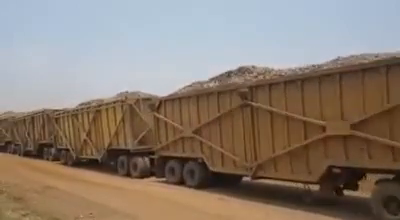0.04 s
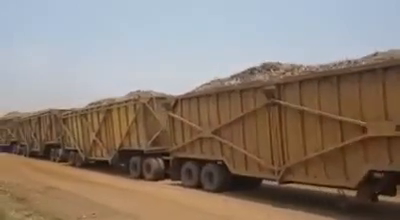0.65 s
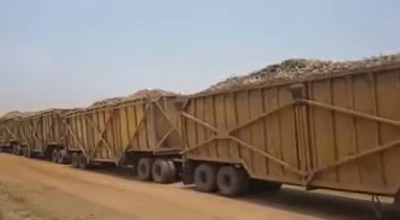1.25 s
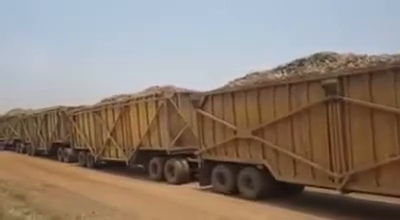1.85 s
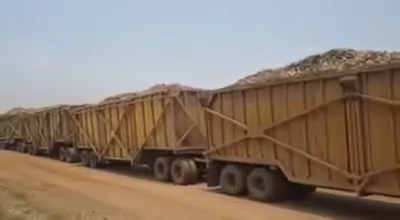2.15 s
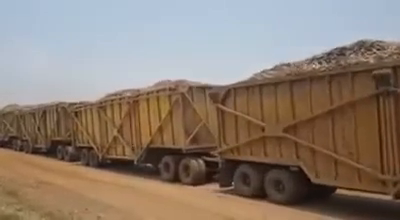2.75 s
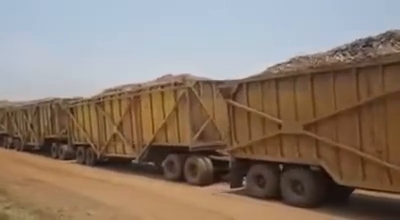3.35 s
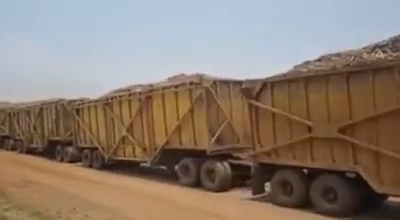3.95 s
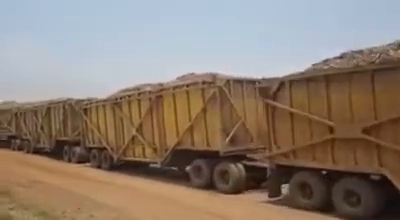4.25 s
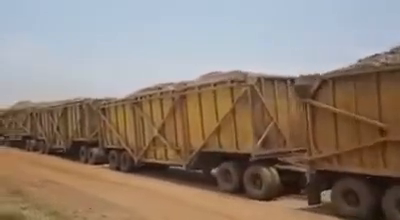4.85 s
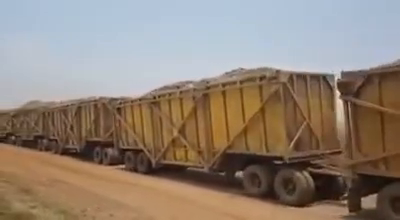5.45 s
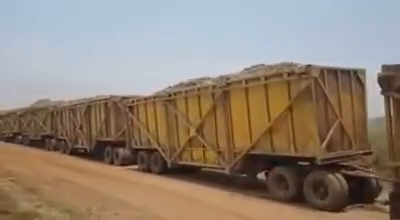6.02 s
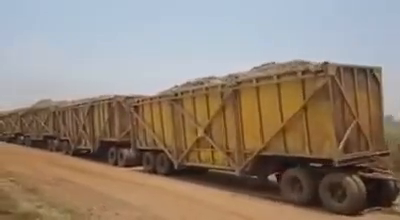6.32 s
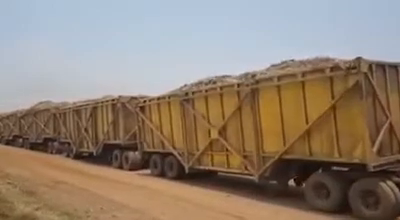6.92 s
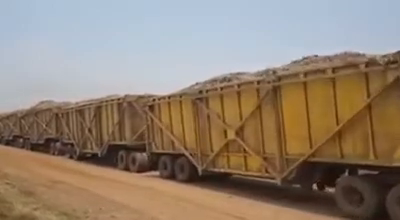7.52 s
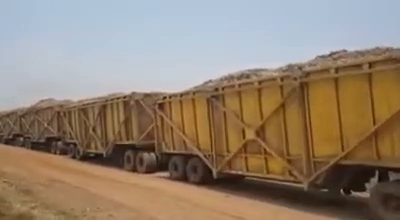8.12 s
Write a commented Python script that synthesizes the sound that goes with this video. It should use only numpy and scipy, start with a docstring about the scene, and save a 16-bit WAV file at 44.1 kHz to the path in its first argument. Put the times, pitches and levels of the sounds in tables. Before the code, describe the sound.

Heavy steel trailers roll slowly by with gritty tyre noise and bursts of clanking, while a low diesel engine draws away.

```python
"""A diesel road train pulls loaded steel trailers slowly along a dirt road, passing close by.
Its exhaust drones and chugs, and its engine clatters ahead on the right, the gear hum fading as it
draws away. The trailers rumble and many tyres grind over grit. Bumps make loose steel rattle and
clank in bursts, couplings thump and stones tick. Gusts buffet the microphones, mostly near the end."""
import sys
import numpy as np
from scipy import signal
from scipy.fft import rfft, irfft, next_fast_len
from scipy.io import wavfile
from scipy.ndimage import map_coordinates

SR = 44100
rng = np.random.default_rng(int(sys.argv[2]) if len(sys.argv) > 2 else 0)


def dump_mix(stems):
    """Bounce the given channels to the path in sys.argv[1] as a 16-bit WAV at rate SR."""
    frames = np.atleast_2d(stems).T  # one column per channel
    limited = np.clip(frames, -1, 1)  # hard clip at full scale
    pcm = np.round(limited * 32767).astype(np.int16)
    wavfile.write(sys.argv[1], SR, pcm)


N = 360507
TIME = np.arange(N) / SR
TRACTOR_LAG_S, TRAILER_LAG_S = 0.00047, 0.000398  # how much later the left microphone hears each


def from_db(db):
    """Turn decibels into a gain."""
    return 10 ** (np.asarray(db) / 20)


def left_gain(db):
    """Stereo gains that change only the left side."""
    return from_db([[db], [0]])


def unit_power(x):
    """Scale a signal to an average power of 1."""
    return x / np.sqrt(np.mean(x ** 2) + 1e-20)


def over_time(rows):
    """Join (seconds, value) points into a value for every sample."""
    return np.interp(TIME, *np.transpose(rows))


def at_hz(rows, hz):
    """Read between (Hz, value) points, with octaves evenly spaced."""
    pitches, values = np.transpose(rows)
    return np.interp(np.log(hz), np.log(pitches), values)


def drift(rate):
    """A smooth random wobble of size about 1 that changes roughly rate times a second."""
    pole = np.exp(-80 * np.pi * rate / SR)
    slow = signal.lfilter([1], [1, -2 * pole, pole * pole], rng.standard_normal(N // 40 + 2002))[2000:]
    return np.interp(np.arange(N) / 40, np.arange(len(slow)), unit_power(slow))


def swell(s, half_s):
    """A smooth rise and fall of height 1 around time s."""
    return np.exp(-.5 * np.minimum(((TIME - s) / half_s) ** 2, 100))


def add(out, s, sound):
    """Mix a short sound in at time s."""
    place = out[..., max(int(s * SR), 0):][..., :sound.shape[-1]]
    place += sound[..., :place.shape[-1]]


def ping(hz, ring_s):
    """A struck note that fades by 60 dB in ring_s seconds."""
    age = TIME[:int(np.clip(ring_s, .005, .3) * SR)]
    return np.sin(2 * np.pi * hz * age) * np.exp(-np.log(1000) * age / ring_s)


def ping_at(s, hz, ring_s):
    """A silent track with one ping at time s."""
    out = np.zeros(N)
    add(out, s, ping(hz, ring_s))
    return out


# Sound that arrives without scattering. Each row: frequency in Hz, share from 0 to 1.
DIRECT_SHARE = [(100, 1), (250, 1), (600, 0.71), (950, 1), (1300, 1), (2000, 0.78), (4000, 0.47),
                (8000, 0.5)]
# Sound bends round to the left microphone. Each row: frequency in Hz, extra delay in milliseconds.
BEND_DELAY = [(300, 0.0041), (600, 0.042), (950, 0.044), (1200, 0.0021), (1650, 0.063), (2100, 0.029),
              (3000, 0.03), (6000, 0)]
# The left microphone is shaded from the truck. Each row: frequency in Hz, gain in dB.
LEFT_SHADE = [(150, 1.5), (500, -1.5), (1000, -0.5), (1600, -1.1), (2500, -7.5), (4700, -5), (8000, -5.5)]


def stereo_noise(spectrum, lag_s, beside):
    """Noise from ahead (reaching the left late), from straight beside, and scattered all around."""
    size = next_fast_len(N)
    hz = np.maximum(np.arange(size // 2 + 1) * SR / size, 1)
    ahead, near, left, right = rfft(rng.standard_normal((4, size)))
    late = ahead * np.exp(-2j * np.pi * hz * (lag_s + at_hz(BEND_DELAY, hz) / 1000))
    straight = np.sqrt(1 - beside) * np.array([late, ahead]) + np.sqrt(beside) * near
    direct = at_hz(DIRECT_SHARE, hz)
    both = np.sqrt(direct) * straight + np.sqrt(1 - direct) * np.array([left, right])
    shade = from_db(at_hz(LEFT_SHADE, hz) * np.array([[1], [0]]))
    return unit_power(irfft(both * shade * from_db(at_hz(spectrum, hz)), size)[:, :N])


def tone(turns, multiple, flutter_db, wander):
    """A multiple of the engine's drone note, unsteady in strength and phase."""
    strength = np.sqrt(2) * from_db(flutter_db * drift(8.5))
    return strength * np.sin(2 * np.pi * multiple * turns + wander * drift(3.6))


# Engine speed, heard as the lowest strong note. Each row: time in seconds, pitch in Hz.
DRONE_PITCH = [(0, 53.61), (1.1, 53.95), (1.65, 53.38), (2.1, 53.98), (2.9, 54.24), (3.3, 53.52),
               (3.65, 54.07), (3.9, 52.92), (4.25, 53.26), (5.0, 52.72), (5.4, 51.84), (5.8, 52.43),
               (6.6, 52.94), (7.5, 53.34), (8.17, 52.25)]


def engine_turns():
    """Count the drone's cycles so far, to keep all engine sounds in step."""
    return np.cumsum(over_time(DRONE_PITCH)) / SR


# The drone and the firing note an octave above it. Each row: time in seconds, level in dB.
DRONE_LEVEL = [(0, -31), (1.0, -32), (1.7, -36), (2.75, -28), (3.6, -37), (4.2, -35), (5.7, -36.5),
               (6.2, -34), (7.7, -35), (8.17, -47)]
FIRING_LEVEL = [(0, -31), (1.35, -30), (1.63, -26), (1.85, -30.5), (3.4, -30), (3.8, -32), (4.15, -29.5),
                (5.05, -32), (5.35, -28), (6.5, -31), (6.8, -28), (7.6, -30), (7.8, -35.5), (8.17, -37.5)]
# Unequal cylinders and the fan. Each row: multiple of the drone note, dB relative to the firing note.
WEAK_NOTES = [(0.499, -28), (1.5, -17.5), (2.5, -23), (2.667, -22.5), (3, -16.5), (3.5, -22.5), (4, -21),
              (5, -28.5), (6, -22), (7, -27.5)]


def exhaust(turns):
    """The exhaust sounds two clean, strong notes; uneven firing adds rough, weaker ones."""
    drone = from_db(over_time(DRONE_LEVEL)) * tone(turns, 1, flutter_db=0.7, wander=0.089)
    firing = tone(turns, 2, flutter_db=0.26, wander=0.12)
    uneven = sum(from_db(db) * tone(turns, k, flutter_db=4.5, wander=1.38) for k, db in WEAK_NOTES)
    return drone + from_db(over_time(FIRING_LEVEL)) * (firing + uneven)


# The exhaust pipe's own notes. Each row: pitch in Hz, relative level in dB, ring time in seconds.
PIPE_NOTES = [(127, 3, .07), (154, 0.5, 0.071), (228, -9.5, 0.033), (344, -3.5, .04)]


def chug(turns, level_db=-37, fade_db_per_s=1.0, pattern=.5, rough=.7, silencer_hz=414):
    """Some firings puff harder into the pipe than others: a pattern of four, and no two alike."""
    firings = np.flatnonzero(np.diff(np.floor(2 * turns)))
    puffs = np.zeros(N)
    puffs[firings] = pattern * np.cos(np.pi * np.arange(len(firings)) / 2)
    puffs[firings] += rough * rng.standard_normal(len(firings))
    pipe = sum(from_db(db) * signal.oaconvolve(puffs, np.diff(ping(hz, ring_s), prepend=0) / hz)[:N]
               for hz, db, ring_s in PIPE_NOTES)
    muffled = signal.sosfilt(signal.butter(2, silencer_hz, fs=SR, output="sos"), pipe)
    return from_db(level_db - fade_db_per_s * TIME) * unit_power(muffled)


# The gear hum's strength. Each row: time in seconds, level in dB.
HUM_LEVEL = [(0, -33), (1.0, -39), (2.05, -37.5), (2.35, -45.5), (3.6, -47.5), (5, -46), (8.17, -48.5)]
# Its notes. Each row: multiple of the drone note, relative level in dB.
HUM_NOTES = [(3, -8.5), (4.98, -13.5), (5.37, -1.5), (6.92, -9), (8.5, -14), (10.4, -6.5), (10.76, -7)]


def gears(turns):
    """The gears hum in step with the engine and fade as the tractor draws away."""
    notes = sum(from_db(db) * tone(turns, k, flutter_db=2.4, wander=0.2) for k, db in HUM_NOTES)
    hum = from_db(over_time(HUM_LEVEL)) * notes
    return np.array([np.interp(TIME - TRACTOR_LAG_S, TIME, hum), hum])


# Engine clatter as the tractor draws away. Each row: time in seconds, level in dB.
BLOCK_LEVEL = [(0, -30), (.9, -30), (2.6, -34.5), (3.6, -41), (4.5, -39.5), (6, -47.5), (8.17, -43.5)]
# The engine block and its covers. Each row: frequency in Hz, relative level in dB.
BLOCK_SPECTRUM = [(110, -13.5), (165, 0), (235, -14), (340, 0), (470, 3.5), (590, 6.5), (760, -4),
                  (950, -3.5), (1350, -2), (1900, -7.5), (2300, -8), (2750, -8), (3200, -19), (5000, -34),
                  (8600, -37)]


def engine_block(turns, depth=0.12, uneven_db=2.0):
    """Burning fuel knocks the block in time with the crank, every other knock stronger."""
    strength = from_db(over_time(BLOCK_LEVEL) + uneven_db * drift(1.2))
    beat = 1 + depth * np.cos(2 * np.pi * turns) * (1 + .5 * np.cos(np.pi * turns))
    return strength * beat * stereo_noise(BLOCK_SPECTRUM, TRACTOR_LAG_S, beside=0.0011)


# The trailers' low rumble. Each row: frequency in Hz, relative level in dB.
RUMBLE_SPECTRUM = [(15, -39.5), (26, -33), (40, -6.5), (70, -1), (100, 3.5), (140, 4.5), (175, -2.5),
                   (230, -5), (350, -5.5), (480, -8), (800, -53.5)]


def rumble(level_db=-32.5, fade_db_per_s=0.54, sway_db=0.9):
    """Trailer bodies rumble, sinking as the front of the train draws away."""
    strength = from_db(level_db - fade_db_per_s * TIME + sway_db * drift(5.0))
    return strength * stereo_noise(RUMBLE_SPECTRUM, lag_s=0.00007, beside=0.67)


# Axle groups rolling past. Each row: time when nearest in seconds, tyre roar in dB.
AXLE_PASSES = [(1.701, -50.5), (3.401, -33.5), (5.199, -36.5), (6.9, -36.5)]
# The tyres' roar. Each row: frequency in Hz, relative level in dB.
ROAR_SPECTRUM = [(200, -12), (370, -5.5), (480, -5), (580, 1.5), (730, -3), (900, -17.5), (1250, -8.5),
                 (1900, -13.5), (4000, -52.5)]
# Narrow, wavering bands of noise. Each row: centre in Hz, dB relative to the passing axles' roar.
FLUTTER_BANDS = [(880, -10), (1030, -13.5), (1550, -13.5), (1950, -14), (2750, -19)]


def wheels(steady_db=-40, half_power_s=0.81, lurch_db=1.57, flutter_db=3.5):
    """Tyres roar louder as each axle group passes; narrow bands of noise waver above the roar."""
    axles = np.sqrt(sum(from_db(db) ** 2 / (1 + ((TIME - s) / half_power_s) ** 2)
                        for s, db in AXLE_PASSES))
    strength = np.hypot(from_db(steady_db), axles) * from_db(lurch_db * drift(13))
    roar = strength * stereo_noise(ROAR_SPECTRUM, TRAILER_LAG_S, beside=0.0088)
    flutter = 0
    for hz, db in FLUTTER_BANDS:
        peak = [(hz / 1.5, -50), (hz / 1.12, -9), (hz, 0), (hz * 1.12, -9), (hz * 1.5, -50)]
        band = stereo_noise(peak, TRAILER_LAG_S, beside=0.13)
        flutter += from_db(db + flutter_db * drift(11.4)) * band
    return roar + axles * flutter


# The hiss of grit. Each row: frequency in Hz, relative level in dB.
GRIT_SPECTRUM = [(900, -27), (1350, -5.5), (1750, 3), (2100, 2), (2350, -0.5), (2750, -3.5), (3300, -18.5),
                 (4000, -5), (4900, -7), (6000, -12), (7200, -12.5), (8600, -26.5)]


def grit(level_db=-38.5, fade_db_per_s=0.32, crunch_db=0.77):
    """Grit hisses and crunches under the tyres, slowly fading."""
    strength = from_db(level_db - fade_db_per_s * TIME + crunch_db * drift(33))
    return strength * stereo_noise(GRIT_SPECTRUM, TRAILER_LAG_S, beside=0.15)


# Gentle shaking between the bumps. Each row: time in seconds, level in dB.
SHAKE_LEVEL = [(0, -58), (1.3, -51), (2.6, -43.5), (3.7, -36.5), (5, -36.5), (6.3, -36.5), (8.17, -41)]
# How strongly chains and latches of each size ring. Each row: pitch in Hz, gain in dB.
LINK_SPECTRUM = [(760, -7.5), (950, -0.5), (1250, -3), (1600, -4), (2050, -3), (2500, -8), (3200, -19),
                 (4600, -2.5)]


def chinks(bumps, count=1500, bump_db=-14.0, spread_db=5.5, cycles=85, scatter_db=3, lag_s=0.00035):
    """Links and latches touch at random, each at its own pitch, harder when shaken more."""
    strength = from_db(bump_db) * bumps + from_db(over_time(SHAKE_LEVEL))
    low_hz, high_hz = LINK_SPECTRUM[0][0], LINK_SPECTRUM[-1][0]
    out = np.zeros((2, N))
    for when, height in rng.random((count, 2)):
        force, pan = np.clip(rng.standard_normal(2), -1.5, 1.5)
        hz = low_hz * (high_hz / low_hz) ** height
        at = int(when * N)
        sound = strength[at] * from_db(at_hz(LINK_SPECTRUM, hz) + spread_db * force) * ping(hz, cycles / hz)
        add(out[0], at / SR + lag_s, sound * from_db(scatter_db * pan / 2))
        add(out[1], at / SR, sound * from_db(-scatter_db * pan / 2))
    return out * left_gain(-3)


# How deeply the noise flickers. Each row: frequency in Hz, swing size in dB.
FLICKER_DEPTH = [(500, 0), (800, 4), (1100, 11.5), (1600, 2.5), (2200, 3.5), (2800, 11.5), (3300, 21),
                 (3900, 3.8), (8000, 4.7)]


def flicker(sound, width_hz=95, hold_s=.045, ceiling=0.89):
    """Narrow strips of the noise's middle and treble flicker, each fading and returning on its own."""
    hz, s, cells = signal.stft(sound, SR, nperseg=1024)
    grid = np.meshgrid(hz / width_hz, s / hold_s, indexing="ij")
    swing = map_coordinates(rng.standard_normal((256, 512)), grid, order=1, mode="wrap")
    gain = from_db(at_hz(FLICKER_DEPTH, np.maximum(hz, 1))[:, None] * np.minimum(swing, ceiling))
    return signal.istft(cells * gain, SR)[1][..., :N]


def knocks(per_s=9, level_db=-30.0, spread_db=3.0, low_hz=350, high_hz=950, cycles=16):
    """Springs and panels knock softly at random, harder where the chains chink more."""
    wait, height, softness = rng.random((200, 3)).T
    times = np.cumsum(-np.log(1 - wait)) / per_s
    pitches = low_hz * (high_hz / low_hz) ** height
    shaking_db = np.interp(times, *np.transpose(SHAKE_LEVEL))
    levels_db = level_db + shaking_db - shaking_db.max() - spread_db * (2 * softness - 1)
    out = sum(from_db(db) * ping_at(s, hz, cycles / hz)
              for s, hz, db in zip(times, pitches, levels_db) if s < TIME[-1])
    return np.array([np.interp(TIME - TRAILER_LAG_S, TIME, out), out])


# Gusts of wind. Each row: middle in seconds, level in dB, half length in seconds.
WIND_GUSTS = [(0.082, -31, 0.018), (5.62, -46, 0.073), (7.25, -35, 0.062), (7.712, -27, 0.037),
              (7.948, -30.5, 0.11)]
# Swirls of air hitting a microphone. Each row: start in seconds, level in dB, pitch in Hz,
# ring time in seconds, left minus right in dB.
EDDIES = [(7.729, -23.5, 203, 0.094, -19), (7.75, -22, 200, 0.026, -24), (7.893, -14, 258, 0.032, 12),
          (7.899, -10, 184, 0.023, 16.5), (7.937, -17.5, 136.9, 0.041, -23),
          (7.991, -22.5, 199, 0.043, -15), (8.029, -24, 198, 0.027, -4)]


def wind(breeze_db=-67, band_hz=(38, 210), lumps_db=3):
    """Gusts make a low, lumpy rumble, separate at each microphone, with a few hard eddies."""
    strength = from_db(breeze_db) + sum(from_db(db) * swell(s, half_s) for s, db, half_s in WIND_GUSTS)
    band = signal.butter(3, band_hz, "band", fs=SR, output="sos")
    air = unit_power(signal.sosfilt(band, rng.standard_normal((2, N))))
    lumps = from_db(lumps_db * np.array([drift(27), drift(25)]))
    eddies = sum(from_db(db + pan * np.array([[.5], [-.5]])) * ping_at(s, hz, ring_s)
                 for s, db, hz, ring_s, pan in EDDIES)
    return strength * lumps * air + eddies


# Bumps in the road. Each row: middle in seconds, dull and bright strengths in dB, half length in seconds.
BUMPS = [(0.763, -40, -49, 0.024), (1.533, -27.5, -42.5, 0.019), (1.671, -25.5, -46, 0.033),
         (1.838, -25.5, -36, 0.018), (1.988, -35.5, -56, 0.028), (2.488, -33.5, -54, 0.019),
         (2.626, -31, -61, 0.047), (2.943, -28, -48, 0.021), (3.095, -29, -46, 0.026),
         (3.255, -33.5, -45.5, 0.027), (3.392, -33.5, -46, 0.025), (3.514, -28.5, -56, 0.03),
         (3.662, -29, -44, .024), (3.799, -31, -44, 0.023), (4.507, -57, -48.5, .024),
         (4.807, -36, -62, 0.034), (4.92, -44, -51, 0.022), (5.494, -36, -67, 0.025),
         (6.307, -35.5, -63, 0.028), (7.328, -56, -41, 0.02)]


def bump_shaking():
    """How hard the bumps shake loose steel over time: one curve dull, one bright."""
    dull = sum(from_db(db) * swell(s, half_s) for s, db, _, half_s in BUMPS)
    bright = sum(from_db(db) * swell(s, half_s) for s, _, db, half_s in BUMPS)
    return dull, bright


# Loose steel's dull clank and bright jingle. Each row: frequency in Hz, relative level in dB.
CLANK_SPECTRUM = [(300, -8), (600, -3.5), (1000, 0), (1400, 0), (1650, 2.5), (1900, 3), (2300, -1),
                  (3000, -13.5), (4300, -4), (8600, -36)]
JINGLE_SPECTRUM = [(1200, -20), (2000, 4), (3000, -3.5), (4300, -0.5), (5000, -5.5), (6000, -7),
                   (7300, -11.5), (8600, -17.5)]


def rattles(dull, bright, grain_db=2.0, clank_db=-5.5):
    """Shaken steel makes so many small contacts that they blur into bursts of noise."""
    grain = unit_power(from_db(grain_db * drift(130)))
    clank = dull * grain * stereo_noise(CLANK_SPECTRUM, TRAILER_LAG_S, beside=0.44)
    jingle = bright * stereo_noise(JINGLE_SPECTRUM, TRAILER_LAG_S, beside=0.56)
    return from_db(clank_db) * left_gain(3) * clank + jingle


# A trailer's steel body. Each row: typical pitch in Hz, relative level in dB, ring time in seconds.
WALL_NOTES = [(559, 0.5, 0.14), (693, -2.5, 0.16), (854, -4, .1), (1014, -4, 0.077), (1195, -4.5, .09),
              (1406, -2, 0.09), (1541, -1.5, 0.078), (1725, 2, 0.048), (1907, 1.5, .11), (2080, -8, .1)]


def trailer_walls(level_db=-5.0, octaves=.25, detune=.055, uneven_db=0.5, jolts=4):
    """Each bump jolts a different wall a few times in quick succession and leaves it ringing."""
    out = np.zeros((2, N))
    for s, bump_db, _, half_s in BUMPS:
        pitches = np.array(WALL_NOTES)[:, 0] * 2 ** (octaves * rng.uniform(-0.992, 1))
        pitches *= 1 + detune * rng.standard_normal(len(pitches))
        for jolt_s in s + half_s * rng.uniform(-1, .5, jolts):
            for hz, (_, db, ring_s) in zip(pitches, WALL_NOTES):
                gain = from_db(level_db + bump_db + db + uneven_db * rng.standard_normal((2, 1)))
                add(out, jolt_s, gain * ping(hz, ring_s))
    return out / np.sqrt(jolts)


# Hard blows of steel on steel. Each row: start in seconds, strength in dB, pitch in Hz.
BLOWS = [(1.528, -17, 1230), (1.598, -23, 2510), (1.651, -20, 1870), (1.833, -22, 1010), (1.971, -25, 2070),
         (2.545, -19, 1700), (2.911, -10.5, 1440), (2.928, -14, 1580), (3.027, -29, 1700),
         (3.082, -11, 1950), (3.118, -17.5, 1740), (3.444, -20, 970), (3.484, -22, 1550),
         (3.644, -15, 2070), (3.659, -16, 1780), (4.508, -21, 2470), (4.797, -12, 1452),
         (5.365, -14.5, 1960), (6.324, -27, 1499), (6.744, -29, 2850)]
# A struck fitting. Each row: multiple of its pitch, relative level in dB, ring time in seconds.
FITTING_NOTES = [(.37, -14, 0.032), (.63, -14.5, .03), (.86, -9, .025), (1, -2, 0.024), (1.19, -12, .025),
                 (1.47, -13.5, 0.026), (2.2, -13, 0.013), (2.6, -13, 0.013)]


def clanks(detune=0.046, uneven_db=2.5, contact_s=.0012):
    """Each blow rings a fitting of its own size beside the microphones, a little differently at each."""
    out = np.zeros((2, N))
    for s, blow_db, pitch_hz in BLOWS:
        for multiple, db, ring_s in FITTING_NOTES:
            hz = pitch_hz * multiple * (1 + detune * rng.standard_normal())
            sound = ping(hz, ring_s) * rng.choice([-1, 1]) / 2
            sound *= 1 - np.exp(-TIME[:len(sound)] / contact_s)  # soften the start
            add(out, s, sound * from_db(blow_db + db - uneven_db * rng.standard_normal((2, 1))))
    return out * left_gain(-1)


# Heavy knocks. Each row: start in seconds, level in dB, pitch in Hz, ring time in seconds.
COUPLING_HITS = [(1.5398, -14, 240, 0.018), (1.5396, -9, 327, 0.033), (1.564, -23, 324, 0.11),
                 (2.136, -26, 315, 0.052), (2.634, -24.5, 576, 0.088), (3.443, -23.5, 654, .05),
                 (4.529, -21.5, 550, 0.063), (4.909, -27, 625, .05), (5.429, -18, 227, 0.05),
                 (5.505, -29, 638, .05), (6.301, -21, 555, 0.045), (6.309, -27, 710, .03),
                 (6.3222, -13.5, 617, 0.023), (6.741, -27, 648, 0.05)]


def couplings():
    """Couplings and springs take up slack with thumps that die quickly."""
    return sum(from_db(db) * ping_at(s, hz, ring_s) for s, db, hz, ring_s in COUPLING_HITS)


# Stones flicked against steel. Each row: start in seconds, level in dB, pitch in Hz.
STONE_HITS = [(2.751, -21.5, 5100), (6.013, -19, 4130), (7.32, -41, 4264)]


def stones(ring_s=0.0026, upper_ratio=1.22):
    """A stone rings two close notes of a steel plate for an instant."""
    ticks = sum(from_db(db) * (ping_at(s, hz, ring_s) + ping_at(s, hz * upper_ratio, ring_s)) / 2
                for s, db, hz in STONE_HITS)
    return ticks * left_gain(-4)


def scene():
    """Engine, tyres, trailers and wind together, in stereo."""
    turns = engine_turns()
    dull, bright = bump_shaking()
    engine = exhaust(turns) + chug(turns) + gears(turns)
    rolling = rumble() + wheels() + grit()
    clatter = flicker(engine_block(turns) + rolling + chinks(dull) + rattles(dull, bright))
    return engine + clatter + knocks() + wind() + trailer_walls() + clanks() + couplings() + stones()


# Narrow dips in the treble. Each row: frequency in Hz, width in Hz.
TREBLE_DIPS = [(3520, 185), (6520, 460)]


def record(dry, cutoff_hz=8700):
    """The treble has two narrow dips, and the very top is cut steeply."""
    for hz, width_hz in TREBLE_DIPS:
        dry = signal.lfilter(*signal.iirnotch(hz, hz / width_hz, fs=SR), dry)
    return signal.sosfilt(signal.ellip(12, .2, 80, cutoff_hz, fs=SR, output="sos"), dry)


dry = scene()
out = record(dry)
dump_mix(out)
```